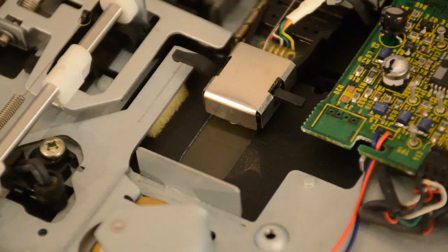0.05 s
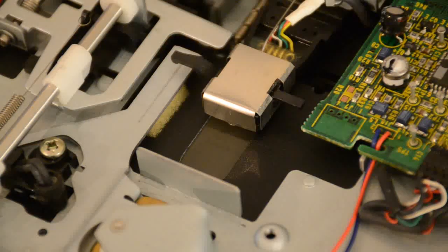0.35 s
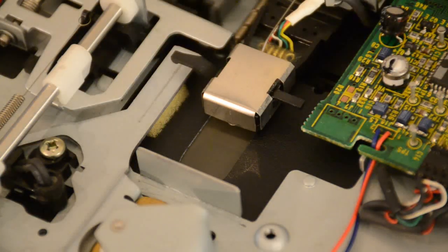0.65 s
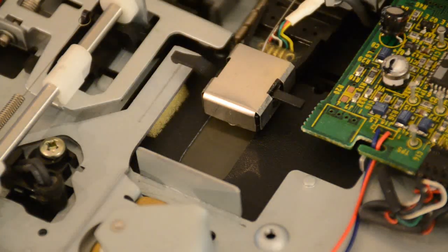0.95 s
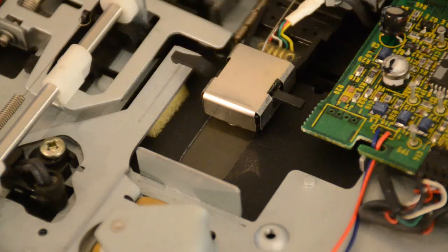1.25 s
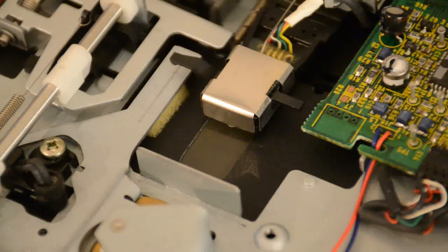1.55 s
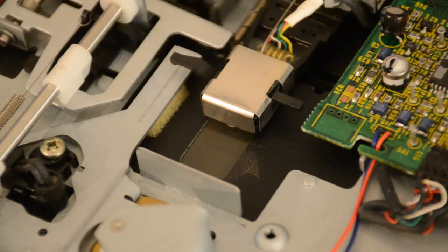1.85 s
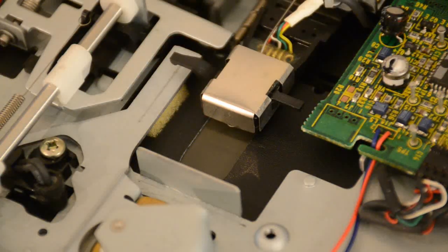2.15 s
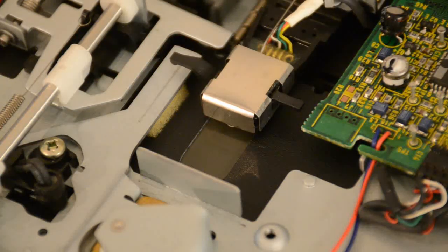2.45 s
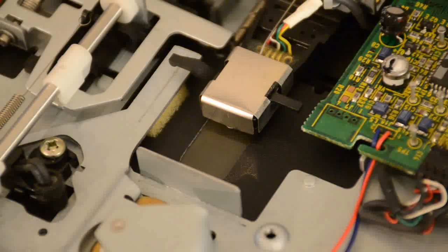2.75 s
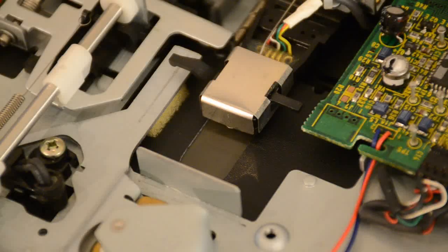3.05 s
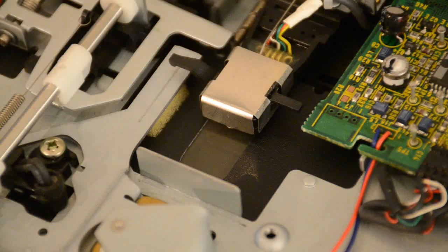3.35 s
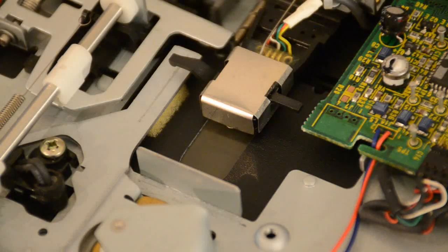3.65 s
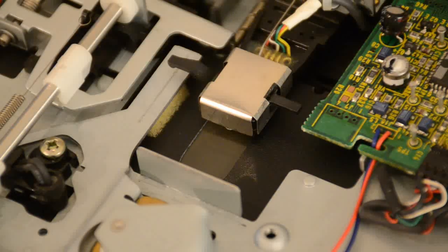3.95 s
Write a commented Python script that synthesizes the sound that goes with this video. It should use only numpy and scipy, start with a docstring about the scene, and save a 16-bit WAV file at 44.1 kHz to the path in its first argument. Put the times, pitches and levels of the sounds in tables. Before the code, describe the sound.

Four sharp, evenly spaced clicks come from the head of an open floppy drive right at the microphone, each briefly ringing the metal chassis. A quiet warbling motor hum and soft, repeating disk rub continue throughout.

```python
"""Open floppy disk drive, close up

One microphone close to the open drive, in mono. The head carriage steps one track every 1.2 s:
it stirs, knocks home, rebounds with a bright tick and rings the metal chassis. Underneath, the spindle
motor warbles once a turn, the mains hums, and the disk rubs in its jacket, much the same on every
revolution. Just after 3 s there is one faint creak."""
import sys
import numpy as np
from scipy import signal
from scipy.fft import rfft, irfft
from scipy.io import wavfile
from scipy.ndimage import uniform_filter1d

SR = 44100
rng = np.random.default_rng(int(sys.argv[2]) if len(sys.argv) > 2 else 0)


def wav_record(signal):
    """Record a signal, one row per channel, as 16-bit PCM in the file named by sys.argv[1]."""
    frames = np.transpose(np.atleast_2d(signal))
    bounded = np.clip(frames, -1, 1)
    # unit amplitude maps onto the largest positive 16-bit level
    quanta = np.round(bounded * 32767).astype(np.int16)
    wavfile.write(sys.argv[1], SR, quanta)


N = 176400
T = np.arange(N) / SR
MOTOR_HZ = 25.042
DISK_S = 5 / MOTOR_HZ  # five motor turns to one disk revolution

# Head steps, right at the microphone: t/s, level/dB, rebound delay/s, rebound boost/dB
HEAD_STEPS = [(0.2948, -1.5, .0047, -1), (1.493, -1.5, 0.0048, 8.5), (2.6931, -1, .0046, 4),
              (3.8891, -0.5, 0.0052, 3)]
# Modes of the metal chassis: f/Hz, level/dB, t60/s
CHASSIS_MODES = [(452, -34.5, 0.12), (511.8, -34.5, 0.19), (618, -46.5, 0.2), (713, -36, 0.14),
                 (827.5, -37.5, 0.17), (958, -35.5, 0.076), (1260, -46, 0.17), (1390, -87, 0.11),
                 (1594, -43, 0.099), (1678, -38.5, .15), (1730, -38.5, 0.15), (1823, -43.5, .12),
                 (2994, -49, 0.093), (5180, -52, 0.2), (7150, -55.5, 0.067)]
# Spectra of the carriage's first contact, knock and rebound: f/Hz, relative level/dB
CONTACT_SPECTRUM = [(60, -62), (300, -13.5), (750, -2), (1100, -35.5), (1700, 12), (2100, 2.5),
                    (2550, -2.5), (2950, 7.5), (3500, -22), (4300, 0.5), (5800, -24), (7200, -8.5),
                    (9000, -17.5), (12000, -33)]
KNOCK_SPECTRUM = [(100, -32), (500, -13), (900, -9), (1100, -7), (1350, 1), (1750, 3), (2050, -6),
                  (2500, -16), (2900, -9), (3500, -19), (4300, -16), (5800, -32), (12000, -44)]
REBOUND_SPECTRUM = [(60, -46), (500, -3), (1750, 8.5), (2550, -15), (4300, -5), (5800, -12), (7200, 5.5),
                    (9500, -18), (12000, -32.5)]


def head_steps():
    """Up front, the carriage stirs, makes contact, knocks home and rebounds; chassis and case ring on."""
    out, t = np.zeros(N), T[:SR // 2]
    case_pattern, contact_pattern = white(), white()
    chassis = sum((-1) ** k * amp(db) * fade(t, t60) * np.sin(2 * np.pi * hz * t)
                  for k, (hz, db, t60) in enumerate(CHASSIS_MODES))
    contact = amp(-24.5) * chatter(contact_pattern, burst(t, rise_s=.0016, t60=.015), CONTACT_SPECTRUM)
    knock = amp(-17.5) * struck_body(KNOCK_SPECTRUM)
    thud = amp(-44) * burst(t, rise_s=.0064, t60=.096) * np.sin(2 * np.pi * 220 * t)
    for at_s, db, rebound_s, boost_db in HEAD_STEPS:
        stir = amp(-44) * chatter(white(), burst(t, rise_s=.0045, t60=.02), KNOCK_SPECTRUM)
        rebound = amp(-34.5) * chatter(white(), burst(t, rise_s=.0005, t60=.011), REBOUND_SPECTRUM)
        case = amp(-35) * case_ring(partly_fresh(case_pattern, kept=.8))
        for delay_s, sound in [(-.0045, stir), (0, contact + chassis + case), (.0018, knock),
                               (rebound_s, amp(boost_db) * rebound), (.0109, thud)]:
            add(out, at_s + delay_s, amp(db) * sound)
    return out


# Diffuse ring of the case: f/Hz, relative level/dB
CASE_SPECTRUM = [(60, -33), (250, -0.5), (500, -4), (950, -6), (1120, -15), (1450, -4.5), (1750, 3.5),
                 (1980, -11.5), (2200, -7.5), (2550, -14), (2950, -7.5), (3450, -18.5), (4200, -11.5),
                 (5400, -17.5), (5800, -18.5), (7200, -13.5), (8600, -17), (10500, -26.5), (12500, -32)]
# Its decay: f/Hz, t60/s
CASE_DECAY = [(200, .17), (1600, 0.2), (4000, 0.19), (8000, 0.16), (12000, 0.076)]


def case_ring(noise):
    """Dense ring of the case and the space around it; the treble dies first."""
    longest = max(t60 for _, t60 in CASE_DECAY)
    ring = chatter(noise, burst(T[:SR // 2], rise_s=.0028, t60=longest), CASE_SPECTRUM)
    hz, t, bands = signal.stft(ring, SR, nperseg=256)
    damping = fade(t, curve_at(CASE_DECAY, hz)[:, None]) / fade(t, longest)
    return signal.istft(bands * damping, SR)[1][:SR // 2]


# Motor tones, as multiples of the shaft speed
SHAFT_ORDERS = [13, 19, 25, 29]
# Warble of each tone: rms level/dB, phase depth/rad, t/s of highest pitch, swell/share
TONE_WARBLES = [(-58.5, 1.23, 0.009, -0.043), (-49, 1.67, 0.0094, 0.13), (-61.5, .95, .01, -0.066),
                (-58, 1.13, 0.018, 0.18)]
# Surge of each tone: height/share, t/s into the disk revolution
TONE_SURGES = [(0.23, 0.084), (0.15, 0.069), (0.34, 0.099), (0.033, 0.03)]


def motor():
    """Under the steps, the spindle motor's tones warble once a turn and surge once a disk revolution."""
    out = np.zeros(N)
    for order, warble, (surge, surge_s) in zip(SHAFT_ORDERS, TONE_WARBLES, TONE_SURGES):
        db, depth_rad, highest_s, swell = warble
        turn = 2 * np.pi * MOTOR_HZ * (T - highest_s)
        flutter = .06 * band(0, width_hz=14)
        phase = 2 * np.pi * order * MOTOR_HZ * T + depth_rad * np.sin(turn) + flutter
        load = passing(surge_s, width_s=.015)
        envelope = (1 + swell * np.cos(turn)) * (1 + surge * (load - load.mean()))
        out += amp(db) * np.sqrt(2) * envelope * np.sin(phase)
    return out


def mains_hum():
    """Steady mains hum beside the motor."""
    return amp(-55.5) * np.sqrt(2) * np.sin(2 * np.pi * 120 * T)


# Spectra of the spindle's rumble and the disk's rub, rough patch and specks: f/Hz, relative level/dB
RUMBLE_SPECTRUM = [(25, -82), (70, -26), (110, -20), (190, -17.5), (290, -11.5), (338, 4), (400, -23.5),
                   (450, -7.5), (515, 0), (570, -3.5), (635, -9.5), (675, -19), (725, -1.5), (810, -13),
                   (1200, -43.5), (3000, -57)]
RUB_SPECTRUM = [(500, -9.5), (1000, 4.5), (2100, -1.5), (2850, 0.5), (3700, -4), (5000, -8), (5750, -14),
                (6400, -8), (7400, -8), (8800, -8), (10000, -13.5), (12500, -19)]
PATCH_SPECTRUM = [(1500, -18), (2900, -2), (5700, -13), (6800, -10), (7300, -1), (8000, -3), (8700, 2),
                  (9200, 1), (9800, -10), (12500, -13)]
SPECK_SPECTRUM = [(800, -31), (2900, 0), (4300, -6.5), (5800, -22), (7500, -9), (12000, -26)]
# Specks passing the head: t/s into the revolution, level/dB
SPECK_PASSES = [(.0345, -56.5), (.072, -65), (.134, -70), (.16, -68), (.182, -70)]


def disk():
    """Low in the background, the spindle rumbles and the disk rubs; a rough patch and specks come round."""
    rumble = amp(-58.5) * revolving_noise(RUMBLE_SPECTRUM)
    uneven_db = .5 * revolving(band(0, width_hz=73))
    rub = amp(-62 + uneven_db) * revolving_noise(RUB_SPECTRUM)
    patch = amp(-62) * passing(at_s=.01, width_s=.0078) * revolving_noise(PATCH_SPECTRUM)
    specks = sum(amp(db) * burst((T - s) % DISK_S, rise_s=.0014, t60=.048) for s, db in SPECK_PASSES)
    return rumble + rub + patch + specks * revolving_noise(SPECK_SPECTRUM)


# Resonances of the creak's scrape: f/Hz, width/Hz, level/dB
SCRAPE_BANDS = [(1770, 430, -66), (2850, 220, -63.5), (3710, 320, -63)]


def creak(at_s=3.107, width_s=.019):
    """One brief creak, faint at the microphone: a thin tone with a scrape above it."""
    tone = amp(-54.5) * np.sin(2 * np.pi * 840 * T)
    scrape = sum(amp(db) * band(hz, width_hz) for hz, width_hz, db in SCRAPE_BANDS)
    return np.exp(-.5 * ((T - at_s) / width_s) ** 2) * (tone + scrape)


def struck_body(spectrum):
    """The minimum-phase ring of a body after one sharp blow, at peak 1."""
    log_gain = np.log(amp(curve_at(spectrum, abs(np.fft.fftfreq(4096, 1 / SR)))))
    ring = np.fft.ifft(np.exp(np.conj(signal.hilbert(log_gain)))).real[:2048]
    return ring / abs(ring).max()


def chatter(noise, envelope, spectrum, smooth_hz=250):
    """A short burst of tiny contacts with an even spectrum, sounding through a body."""
    size = 2 * len(envelope)
    bins = rfft(noise[:len(envelope)] * envelope, size)
    power = uniform_filter1d(abs(bins) ** 2, size=round(smooth_hz * size / SR))
    contacts = irfft(bins / np.sqrt(power + 1e-20), size)
    sound = signal.fftconvolve(contacts, struck_body(spectrum))[:len(envelope)]
    return unit(sound) * np.sqrt(np.mean(envelope ** 2))


def revolving(x):
    """Repeats a pattern on every revolution of the disk."""
    return np.resize(x[:round(DISK_S * SR)], N)


def revolving_noise(spectrum):
    """Coloured noise at rms 1 that mostly repeats on every revolution."""
    noise = partly_fresh(revolving(white()), kept=.7)
    gain = amp(curve_at(spectrum, np.fft.rfftfreq(N, 1 / SR)))
    return unit(irfft(rfft(noise) * gain, N))


def passing(at_s, width_s):
    """A bell-shaped swell that comes round on every revolution."""
    offset_s = (T - at_s + DISK_S / 2) % DISK_S - DISK_S / 2
    return np.exp(-.5 * (offset_s / width_s) ** 2)


def white():
    """Fresh white noise."""
    return rng.standard_normal(N)


def band(hz, width_hz):
    """Noise in one bell-shaped band; around 0 Hz it is a slow wander."""
    bell = np.exp(-((np.fft.rfftfreq(N, 1 / SR) - hz) / width_hz) ** 2)
    return unit(irfft(rfft(white()) * bell, N))


def partly_fresh(pattern, kept):
    """Noise with a share of its power kept from a pattern and the rest fresh."""
    return np.sqrt(kept) * pattern + np.sqrt(1 - kept) * white()


def fade(t, t60):
    """Exponential decay, 60 dB down at t60."""
    return np.exp(-np.log(1000) * t / t60)


def burst(t, rise_s, t60):
    """A straight rise, then a decay."""
    return np.clip(t / rise_s, 0, 1) * fade(np.maximum(t - rise_s, 0), t60)


def amp(db):
    """Decibels to gain."""
    return 10 ** (np.asarray(db) / 20)


def unit(x):
    """Scales to rms 1."""
    return x / np.sqrt(np.mean(x ** 2) + 1e-20)


def curve_at(points, hz):
    """Reads a table on a log-frequency axis."""
    f, value = np.transpose(points)
    return np.interp(np.log(hz + 1), np.log(f + 1), value)


def add(mix, at_s, sound):
    """Mixes a sound in at a given time."""
    part = mix[max(round(at_s * SR), 0):][:len(sound)]
    part += sound[:len(part)]


def scene():
    """The whole drive at one close microphone."""
    return (head_steps() + motor() + mains_hum() + disk() + creak())[None]


def record(dry, cutoff_hz=12600):
    """The recorder's band limit cuts the top treble."""
    lowpass = signal.firwin(511, cutoff_hz, window=("kaiser", 9), fs=SR)
    return signal.oaconvolve(dry, lowpass[None], "same")


dry = scene()
out = record(dry)
wav_record(out)
```